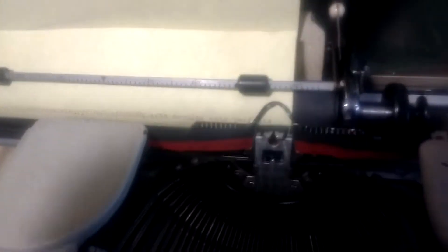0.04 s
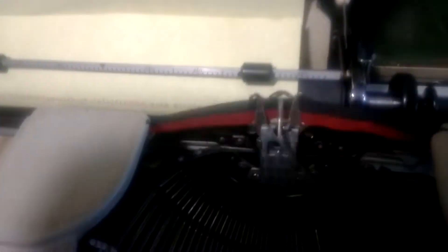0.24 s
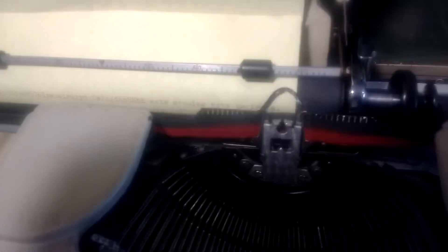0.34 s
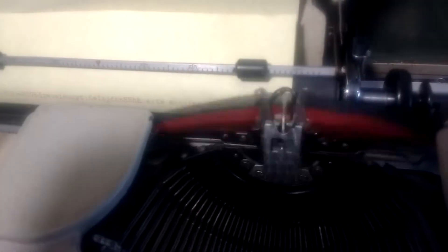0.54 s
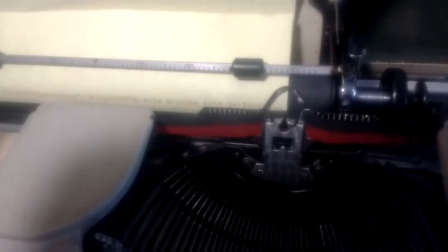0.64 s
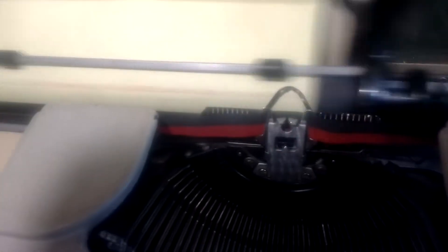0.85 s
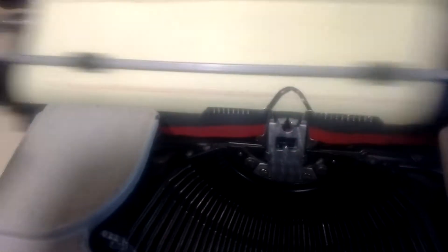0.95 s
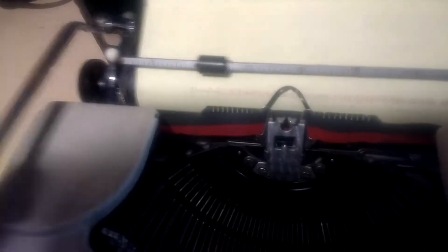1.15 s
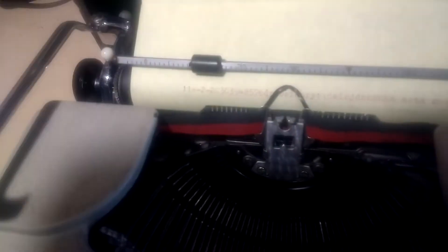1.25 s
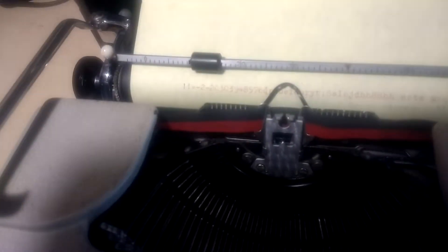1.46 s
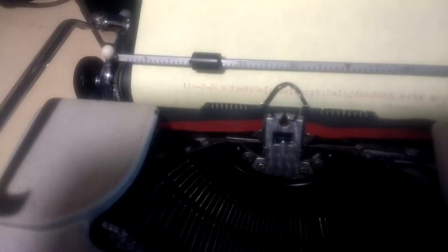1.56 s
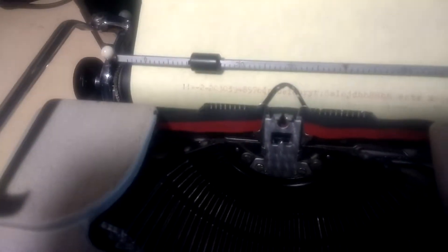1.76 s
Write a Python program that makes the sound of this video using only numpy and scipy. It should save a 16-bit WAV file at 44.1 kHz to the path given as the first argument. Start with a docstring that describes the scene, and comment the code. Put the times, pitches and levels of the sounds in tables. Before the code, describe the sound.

A manual typewriter, miked close in a quiet room: three or four hard metallic key clacks with ringing typebars, then the carriage rasps along, bangs its stop, shudders, and a lever snaps twice.

```python
"""A manual typewriter, miked close up: typebars clack on the platen, ring in their basket and fall on their rest.
Its carriage is then released, rolls, hits the margin stop and shudders; a lever snaps twice, then faintly once more.
Blows are short bursts of coloured noise, with decaying sines where metal, platen or case rings.
The desk drones low and the room is quiet; the two channels are out of phase, so the machine sounds wide."""
import sys
import numpy as np
from scipy.fft import rfft, irfft, next_fast_len
from scipy.io import wavfile
from scipy.ndimage import uniform_filter1d, map_coordinates

SR = 44100
rng = np.random.default_rng(int(sys.argv[2]) if len(sys.argv) > 2 else 0)


def generate_wav(sig):
    """Save sig (samples, or channels by samples) to the path in sys.argv[1] as 16-bit PCM at SR."""
    pcm = np.round(np.clip(np.atleast_2d(sig).T, -1, 1) * 32767).astype(np.int16)
    wavfile.write(sys.argv[1], SR, pcm)


N = 79380  # samples
TIME_S = np.arange(N) / SR
TOP_HZ = 15600  # band limit of the recorder


def amp(db):
    """Decibels to gain."""
    return 10 ** (np.asarray(db) / 20)


def along(points, hz):
    """Read (Hz, value) points on a log frequency axis."""
    point_hz, value = np.transpose(points)
    return np.interp(np.log(hz + 1), np.log(point_hz + 1), value)


def grid():
    """FFT length, padded past the end, and its frequencies in Hz."""
    size = 2 * next_fast_len((N + SR // 4) // 2)
    return size, np.fft.rfftfreq(size, 1 / SR)


# Likeness of the two channels at full spread. Each row: frequency in Hz, likeness from 0 to 1.
ALIKE = [(120, 0.97), (350, 0.79), (1000, 0.87), (1550, 0), (2200, 0.84), (7000, 0.4), (10500, .25)]


def noise(level, spectrum, peaks=(), spread=1):
    """Noise under a level curve, through a causal colour with resonances; row 0 is direct sound, row 1 diffuse."""
    size, hz = grid()
    lift_db = sum(db / (1 + ((hz - centre) / width) ** 2) for centre, width, db in peaks)
    gain = amp(along(spectrum, hz) + lift_db)
    gain = gain / np.sqrt(np.mean(gain ** 2 * (hz < TOP_HZ)))
    # folding the cepstrum gives minimum phase: nothing sounds before its blow
    cepstrum = irfft(np.log(gain))
    cepstrum[1:size // 2] *= 2
    cepstrum[size // 2 + 1:] = 0
    colour = np.exp(rfft(cepstrum))
    turn = spread * np.arccos(np.clip(along(ALIKE, hz), 0, 1)) / 2
    coloured = rfft(level * rng.standard_normal((2, N)), size) * colour
    return irfft(coloured * [np.cos(turn), np.sin(turn)], size)[:, :N]


def bursts(rows, attack_s, hold_s, t60):
    """Attack, hold and decay (t60 in seconds) for each (s, dB) row, summed in power."""
    power = np.zeros(N)
    for start_s, db in rows:
        t = TIME_S - start_s
        rise = np.clip(t / attack_s, 0, 1)
        decay_db = 60 * np.maximum(t - attack_s - hold_s, 0) / t60
        power += (rise * amp(db - decay_db)) ** 2
    return np.sqrt(power)


SCATTER_DB = 1  # spread of mode levels from blow to blow


def ringing(rows, modes, attack_s):
    """Each (s, dB) blow rings the modes anew as decaying sines, with fresh phases and slightly new levels."""
    out = np.zeros((2, N + 2 * SR))  # a spare second at each end
    t = np.arange(SR // 2) / SR
    hz, level_db, t60 = np.transpose(modes)
    decay = amp(level_db[:, None] - 60 * t / t60[:, None])
    waves = np.exp(2j * np.pi * hz[:, None] * t) * decay * (1 - np.exp(-t / attack_s))
    for start_s, db in rows:
        strength = amp(db + SCATTER_DB * rng.standard_normal(len(hz)))
        weights = strength * np.exp(2j * np.pi * rng.random(len(hz)))
        out[0, SR + round(start_s * SR):][:len(t)] += (weights @ waves).real
    return out[:, SR:SR + N]


# Typebar hits the platen. Each row: start in seconds, blow level in dB, low thump in dB, top crack in dB.
STRIKES = [(-.043, -21, -40, -30.5), (0.2258, -19, -28, -18.5), (0.3936, -22, -38.5, -41),
           (0.5622, -24, -40, -27)]
# Colours of the clack, basket, low thump, top crack and key linkage. Each row: frequency in Hz, relative dB.
CLACK = [(40, -39), (130, -12.5), (400, -32.5), (1500, -15.5), (2300, 2), (2900, -13.5), (3800, -4.5),
         (4800, 1.5), (6700, 0.5), (9200, -5.5), (10800, -3.5), (15300, -22.5)]
BASKET = [(40, -21), (120, -13), (300, -6.5), (800, -4.5), (1600, -4.5), (3000, -4.5), (4800, 2), (7500, 2),
          (9200, -5.5), (11000, -6.5), (15300, -17.5)]
THUMP = [(30, -14), (70, -6.5), (130, -1), (280, -4), (530, -2.5), (900, -11), (1900, -6.5), (4000, -13),
         (15000, -70)]
CRACK = [(100, -38), (4000, -2.5), (9000, 4), (12500, -4), (15500, -8)]
LINKAGE = [(60, -7), (200, -11.5), (600, 2.5), (1100, -0.5), (1700, -2.5), (3000, -7), (6000, -9),
           (11000, -11), (15300, -12.5)]
# Resonances of the typebars. Each row: frequency in Hz, half width in Hz, lift in dB.
TYPEBAR = [(4200, 79, 3.5), (4793, 70, 4), (6830, 48, 3.5), (7590, 100, -1.5)]
# Typebar ping, give of the platen, ring of the frame. Each row: frequency in Hz, relative dB, t60 in seconds.
STRIKE_MODES = [(4265, -11, 0.019), (4720, 2, 0.021), (4950, -13.5, 0.022), (6410, -6.5, .025),
                (8080, -6, .02)]
PLATEN_MODES = [(155, -4.5, 0.022), (506, -4, 0.022)]
FRAME_MODES = [(131, 3.5, 0.17), (338, -7.5, 0.57), (517, -6, 0.52), (830, -10, 0.44), (1060, 3, 0.224)]
# Levels below are relative to the blow.
ESCAPE_LEAD_S, ESCAPE_DB = 0.012, -21.5  # the escapement trips just before each strike
CLACK_DB, CLACK_ATTACK_S = -2, .0009
STEEL_DELAY_S, STEEL_DB = 0.000789, -3
BASKET_DB, BASKET_T60_S, FRAME_DB = -14.5, 0.21, -33.5
RING_HZ, RING_DB, RING_T60_S, RING_WAVER_DB = 708, -36, .8, 2.5  # the frame's longest note


def strikes():
    """Escapement, then a hard clack with thump, bright crack and steel ping; the basket and frame ring on."""
    s, level, thump_db, crack_db = np.transpose(STRIKES)
    blows = list(zip(s, level))
    trips = zip(s - ESCAPE_LEAD_S, level + ESCAPE_DB)
    escape = noise(bursts(trips, 0.0029, 0.0055, 0.081), LINKAGE)
    clack_level = amp(CLACK_DB) * bursts(blows, CLACK_ATTACK_S, 0.00063, 0.021)
    clack = noise(clack_level, CLACK, TYPEBAR, spread=0.21)
    steel = ringing(zip(s + STEEL_DELAY_S, level + STEEL_DB), STRIKE_MODES, .0002)
    thump = noise(bursts(zip(s, thump_db), 0.00066, 0.00015, 0.013), THUMP, spread=0.25)
    platen = ringing(zip(s, thump_db), PLATEN_MODES, 0.00037)
    crack = noise(bursts(zip(s, crack_db), 0.00012, 0.00021, 0.0044), CRACK, spread=0.12)
    basket_level = amp(BASKET_DB) * bursts(blows, 0.0017, 0.0029, BASKET_T60_S)
    basket = noise(basket_level, BASKET, TYPEBAR, spread=0.47)
    frame = amp(FRAME_DB) * ringing(blows, FRAME_MODES, 0.00069)
    # the long note runs on from strike to strike; its level wavers through 20 random points a second
    waver = map_coordinates(rng.standard_normal(40), [TIME_S * 20])
    note_level = amp(RING_DB + RING_WAVER_DB * waver) * bursts(blows, 0.0051, .01, RING_T60_S)
    frame[0] += note_level * np.sin(2 * np.pi * RING_HZ * TIME_S)
    return escape + clack + steel + thump + platen + crack + basket + frame


# Key linkage takes up or lets go. Each row: start in seconds, level in dB.
TICKS = [(.04, -51), (.203, -58.5), (.307, -50.5), (.361, -52), (.472, -47), (.53, -48), (.542, -52.5),
         (.653, -49.5)]
# Key lever hums briefly as it is pressed or let go. Each row: start in seconds, level in dB.
LEVERS = [(.008, -56), (.204, -55), (.218, -55), (.288, -51), (.362, -52), (.448, -51), (.532, -50),
          (.624, -54)]
# Typebar drops on its padded rest. Each row: start in seconds, level in dB before the trims of thud and rest.
RETURNS = [(.047, -43.5), (0.3148, -37.5), (.4815, -36), (.666, -38), (1.652, -55.5)]
# Colours of the key lever and of the padded thud. Each row: frequency in Hz, relative dB.
LEVER = [(300, -36.5), (850, -11), (1100, 1), (1350, -23), (2500, -19.5), (15000, -59)]
THUD = [(40, -36), (120, -5), (350, -8), (560, -4), (750, 8), (1080, -22), (1500, -12.5), (2500, -11.5),
        (5000, -20), (9000, -32), (15300, -35)]
# Resonances of the case, also shaken by the carriage. Each row: frequency in Hz, half width in Hz, lift in dB.
CASE_PEAKS = [(364, 22, 1.7), (530, 35, 1.2), (804, 63, 4.5), (928, 10, 6.9), (1061, 43, 7.2)]
# Modes of the typebar rest. Each row: frequency in Hz, relative dB, t60 in seconds.
REST_MODES = [(560, 0, 0.05), (700, 1, 0.06), (803, -1, 0.04), (960, -1, 0.04), (1060, 2, 0.06)]
BOUNCE_S, BOUNCE_DB = 0.0057, -4  # spacing of the bounces, and change of level at each
THUD_TRIM_DB, REST_TRIM_DB = -5.5, -4


def keys():
    """Linkages tick, levers hum briefly, and each typebar lands with two soft bounces while its rest rings."""
    ticks = noise(bursts(TICKS, 0.00077, 0.0016, 0.16), LINKAGE)
    levers = noise(bursts(LEVERS, 0.002, 0.011, 0.047), LEVER)
    landings = [(s + k * BOUNCE_S, db + k * BOUNCE_DB) for s, db in RETURNS for k in range(3)]
    thuds = amp(THUD_TRIM_DB) * noise(bursts(landings, 0.00037, 0.00097, 0.05), THUD, CASE_PEAKS)
    rest = amp(REST_TRIM_DB) * ringing(RETURNS, REST_MODES, 0.0026)
    return ticks + levers + thuds + rest


# Carriage release catch clicks. Each row: start in seconds, level in dB.
RELEASE = [(.767, -46), (.774, -45.5)]
# Carriage rolls and rattles out, a curve. Each row: time in seconds, level in dB before the rasp and rail trim.
SLIDE = [(.75, -68), (0.813, -53.5), (0.859, -50.5), (0.896, -59), (.925, -52.5), (.98, -55), (1.04, -51.5),
         (1.085, -55), (1.22, -57.5), (1.27, -74), (1.359, -72), (1.45, -67.5)]
# Pawl clatters on the rack as the carriage starts and rebounds. Each row: start in seconds, level in dB.
RACK = [(0.808, -44.5), (.826, -40.5), (.849, -42), (0.909, -56), (0.933, -59), (1.1502, -41), (1.203, -50)]
# Carriage hits the margin stop and rebounds.
# Each row: start in seconds, level in dB, case note in Hz, note level in dB.
STOPS = [(1.0897, -31.5, 950, -44.5), (1.1046, -31.5, 893, -42.5), (1.118, -38.5, 798, -45)]
# The machine shudders. Each row: start in seconds, level in dB, case note in Hz, note level in dB.
BUMPS = [(1.144, -48.5, 876, -42), (1.151, -54.5, 933, -43.5), (1.163, -58, 343, -49.5),
         (1.178, -48.5, 834, -47), (1.204, -49.5, 335, -46), (1.211, -46, 1055, -43),
         (1.229, -70, 720, -42.5), (1.288, -60.5, 810, -71)]
# Colours of the catch, rail, stop and case. Each row: frequency in Hz, relative dB.
CATCH = [(60, -28), (600, -5), (1400, -11.5), (2250, 6.5), (3200, -15), (4200, -2), (8000, -5.5),
         (15300, -21.5)]
RAIL = [(40, -11), (120, -22), (400, 0), (1000, -1), (1400, -2), (2300, -3.5), (4500, -4.5), (6500, -9),
        (11000, -12), (15300, -18)]
STOP = [(60, -17), (300, -15.5), (900, -1.5), (1250, -5.5), (1750, 0.5), (2800, -2), (4100, 4.5), (6000, 3),
        (8100, 1), (10000, -2), (15300, -5.5)]
CASE = [(40, -26), (120, -15), (300, 12), (900, 2), (1500, 5), (3000, -1), (4500, -7.5), (8000, -14.5),
        (15300, -40)]
# Resonances of the rack. Each row: frequency in Hz, half width in Hz, lift in dB.
PAWL_PEAKS = [(1790, 60, 8), (2310, 160, 7.5), (4080, 72, 8)]
# Modes of the steel stop. Each row: frequency in Hz, relative dB, t60 in seconds.
STOP_MODES = [(3993, -2, .1), (4060, -1, .1), (4535, -2, .09), (6680, -10, .1), (8105, -7, .08),
              (12500, -14, .08)]
RASP_DB = 2.3  # random flutter of the rolling level
RAIL_TRIM_DB, STOP_TAIL_DB, STOP_RING_DB, CASE_TAIL_DB = -0.5, -18.5, -6, -8
KNOCK_T60_S = 0.068


def carriage():
    """The carriage clicks free, rolls with a rasp and a clattering pawl, hits the steel stop and shakes the case."""
    s, db = np.transpose(SLIDE)
    stops = [row[:2] for row in STOPS]
    bumps = [row[:2] for row in BUMPS]
    catch = noise(bursts(RELEASE, 0.00067, 0.0021, 0.054), CATCH)
    grain = uniform_filter1d(rng.standard_normal(N), size=110)  # 2.5 ms averages
    roll_db = np.interp(TIME_S, s, db, left=-120, right=-120)
    roll = amp(roll_db + RASP_DB * grain / grain.std())
    rail = amp(RAIL_TRIM_DB) * noise(roll, RAIL, CASE_PEAKS)
    pawl = noise(bursts(RACK, 0.00038, 0.0011, 0.045), RAIL, PAWL_PEAKS)
    stop_tail = amp(STOP_TAIL_DB) * bursts(stops, 0.0042, 0.0042, 0.3)
    stop = noise(bursts(stops, 0.00093, 0.0016, 0.029) + stop_tail, STOP, spread=0.49)
    steel = amp(STOP_RING_DB) * ringing(stops, STOP_MODES, 0.0005)
    case_tail = amp(CASE_TAIL_DB) * bursts(bumps, 0.011, 0.0039, 0.35)
    case = noise(bursts(bumps, 0.0016, 0.0023, 0.046) + case_tail, CASE, CASE_PEAKS)
    return catch + rail + pawl + stop + steel + case + knocks(STOPS + BUMPS)


def knocks(rows):
    """Each blow on the case rings the note of the panel that it shakes."""
    return sum(ringing([(s, db)], [(hz, 0, KNOCK_T60_S)], 0.00078) for s, _, hz, db in rows)


# Carriage lever snaps. Each row: start in seconds, level in dB, knock of the case in dB.
SNAPS = [(1.4624, -34.5, -62), (1.5003, -35, -41), (1.788, -49, -51)]
# Colour of the snap. Each row: frequency in Hz, relative dB.
SNAP = [(60, -31), (250, -12), (750, 4.5), (1050, -5), (1350, -8), (2000, -7.5), (4900, -6.5),
        (7000, -10.5), (12500, -10), (15300, -17)]
# Resonances of the lever. Each row: frequency in Hz, half width in Hz, lift in dB.
SNAP_PEAKS = [(1790, 77, 7.4), (2290, 120, 5.2), (9280, 300, 6.4)]
# Modes of the case under the lever. Each row: frequency in Hz, relative dB, t60 in seconds.
SNAP_MODES = [(528, -4, 0.066), (690, -6, 0.11), (797, -5, 0.075), (965, 0, 0.052), (1056, -1.5, 0.08)]
SNAP_TAIL_DB = -14.5


def snaps():
    """Dry metal snaps with a hollow knock of the case and a short tail."""
    s, level, knock_db = np.transpose(SNAPS)
    blows = list(zip(s, level))
    tail = amp(SNAP_TAIL_DB) * bursts(blows, 0.0041, 0.0065, 0.25)
    snap = noise(bursts(blows, 0.00059, 0.0012, 0.045) + tail, SNAP, SNAP_PEAKS)
    return snap + ringing(zip(s, knock_db), SNAP_MODES, 0.0027)


# Low drone of the desk, a curve. Each row: time in seconds, level in dB.
DRONE = [(0, -62.5), (.2, -78.5), (.41, -59.5), (.6, -66), (.71, -66), (.79, -78.5), (1.12, -72),
         (1.25, -58.5), (1.401, -78.5), (1.52, -66.5), (1.7, -83)]
# Colour of the desk. Each row: frequency in Hz, relative dB.
DESK = [(60, -29.5), (95, -6.5), (121, 3), (150, -9.5), (210, -5.5), (1500, -54)]


def desk():
    """The desk drones while the machine shakes it: low noise under a level curve."""
    s, db = np.transpose(DRONE)
    return noise(amp(np.interp(TIME_S, s, db)), DESK)


# Colour of the quiet room. Each row: frequency in Hz, relative dB.
ROOM_TONE = [(25, -35), (60, -8.5), (120, -0.5), (250, -5), (700, -1.5), (1500, -12), (4000, -13),
             (9000, -18.5), (15300, -23.5)]
ROOM_DB = -67


def room():
    """Steady coloured noise of the quiet room."""
    return noise(amp(ROOM_DB), ROOM_TONE)


# Phase by which left leads right in the direct sound, below the lag. Each row: frequency in Hz, phase in radians.
LOW_PHASE = [(30, -3), (120, -2), (250, -1.43), (500, -1.47), (1350, 0.7), (1550, -3), (2100, -4.5)]
# Balance of the channels. Each row: frequency in Hz, left minus right in dB.
BALANCE = [(250, 1), (700, 3), (1400, -2), (2500, 0)]
LAG_S, LAG_FROM_HZ, MIRROR_FROM_HZ = .000561, 2100, 3119


def widen(pair):
    """Treble is opposite in polarity and half a millisecond apart; diffuse treble lags the other way."""
    size, hz = grid()
    phase = np.where(hz < LAG_FROM_HZ, along(LOW_PHASE, hz), np.pi - 2 * np.pi * LAG_S * hz)
    diffuse_phase = np.where(hz < MIRROR_FROM_HZ, phase + np.pi, -phase)
    direct, diffuse = rfft(pair, size)
    half = np.array([[.5], [-.5]])  # left and right each take half of the difference
    channels = direct * np.exp(1j * half * phase) + diffuse * np.exp(1j * half * diffuse_phase)
    return irfft(channels * amp(half * along(BALANCE, hz)), size)[:, :N]


def scene():
    """The machine on its desk over a quiet room."""
    return widen(strikes() + keys() + carriage() + snaps() + desk() + room())


def record(dry):
    """The recorder cuts steeply above its band limit."""
    size, hz = grid()
    return irfft(rfft(dry, size) / np.sqrt(1 + (hz / TOP_HZ) ** 160), size)[:, :N]


dry = scene()
out = record(dry)
generate_wav(out)
```